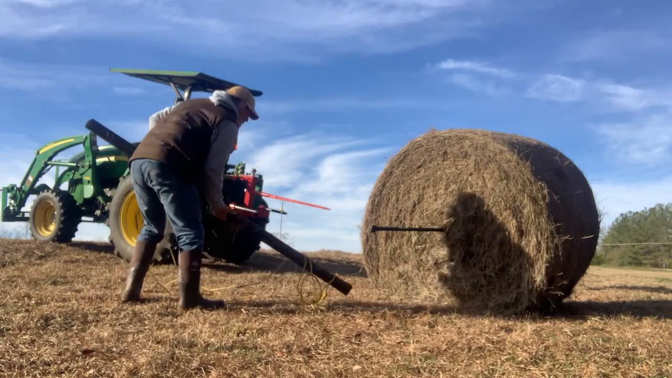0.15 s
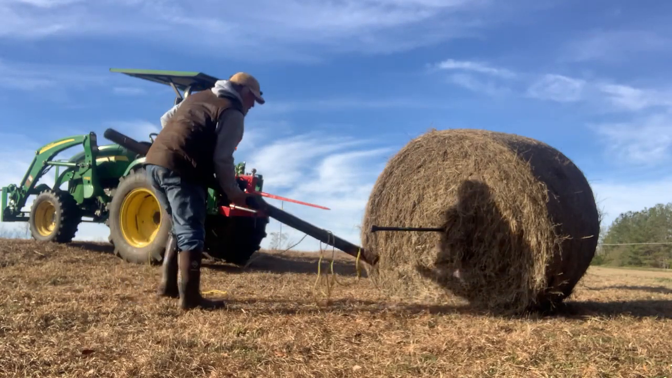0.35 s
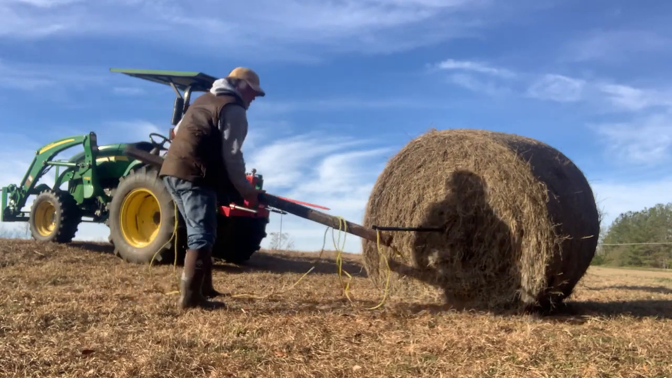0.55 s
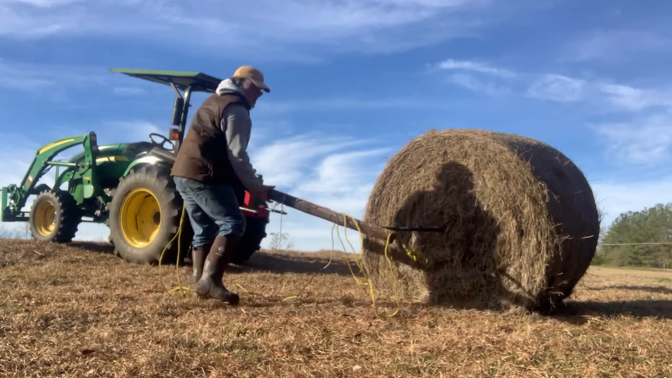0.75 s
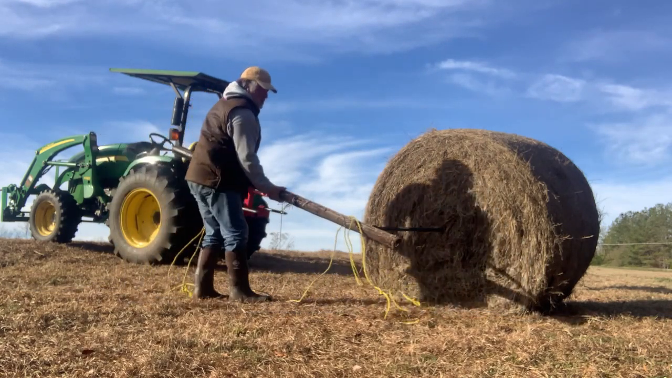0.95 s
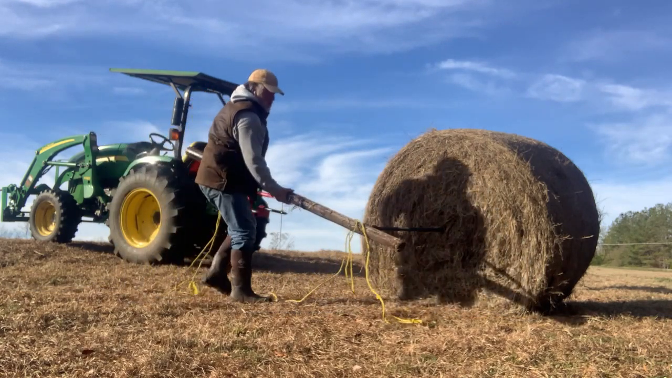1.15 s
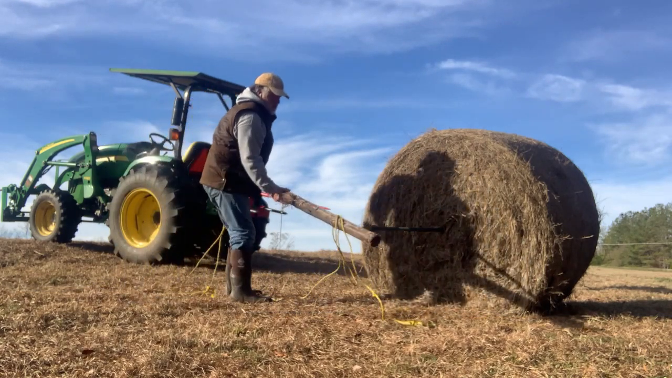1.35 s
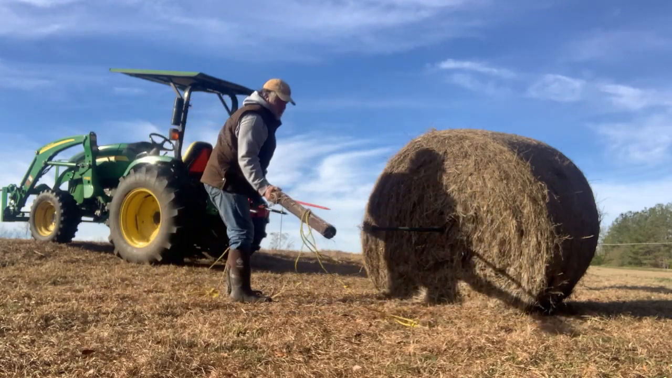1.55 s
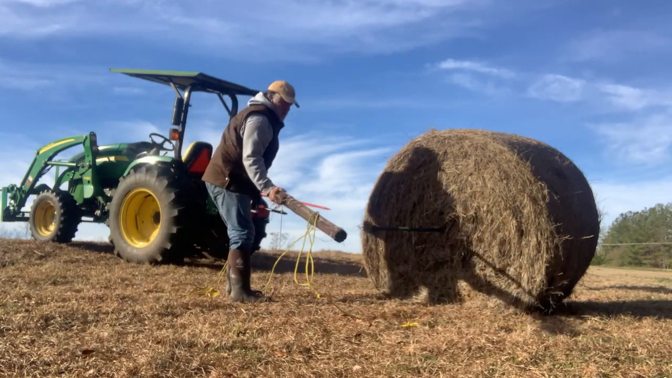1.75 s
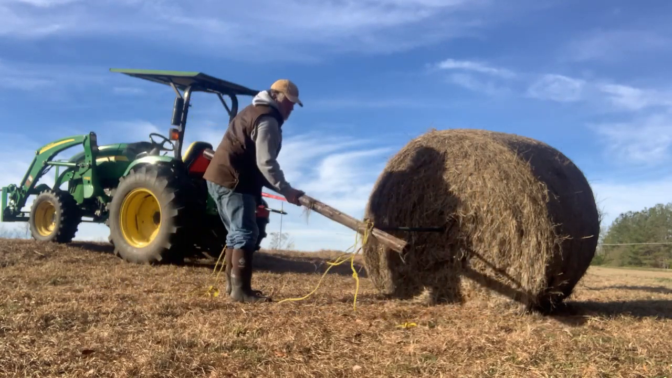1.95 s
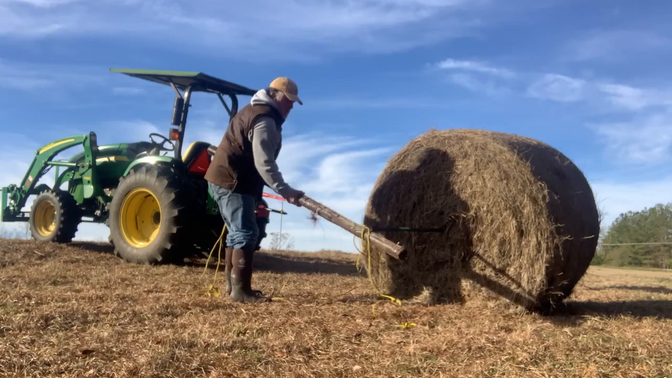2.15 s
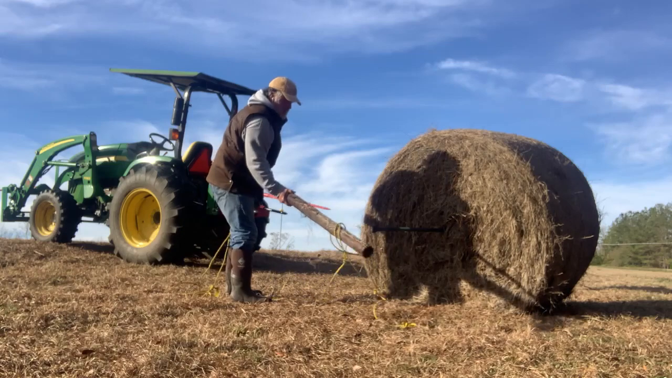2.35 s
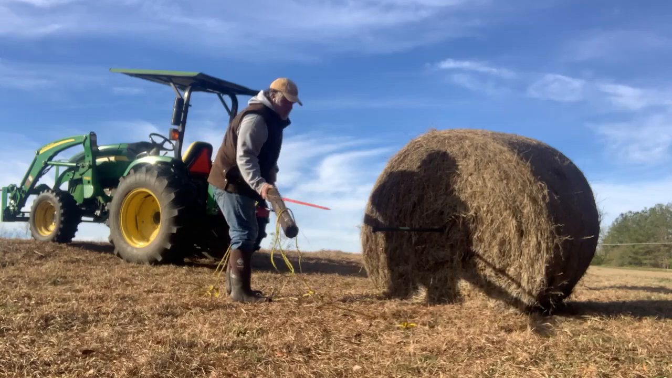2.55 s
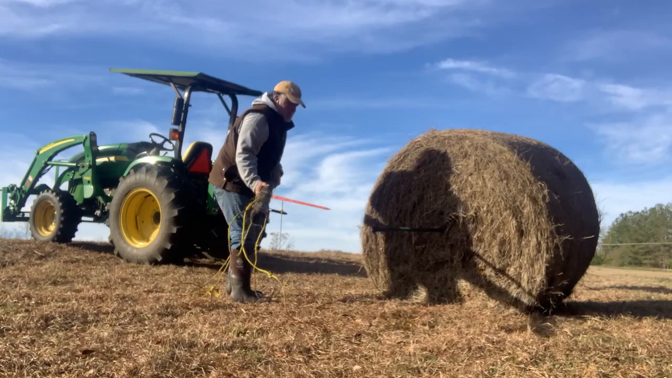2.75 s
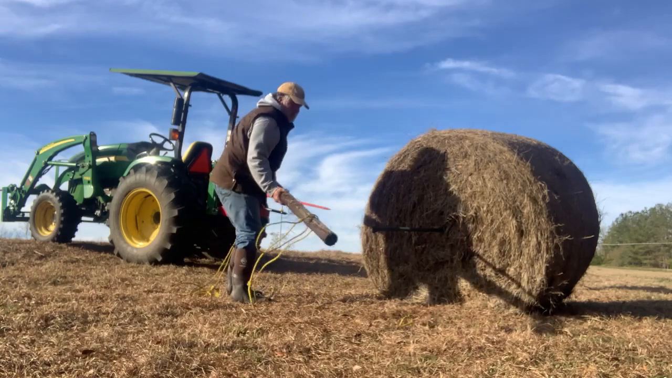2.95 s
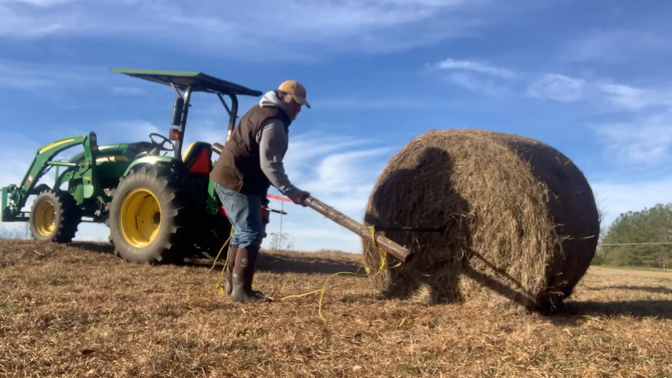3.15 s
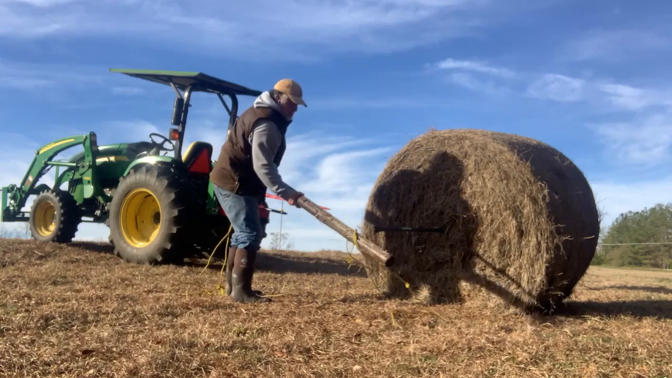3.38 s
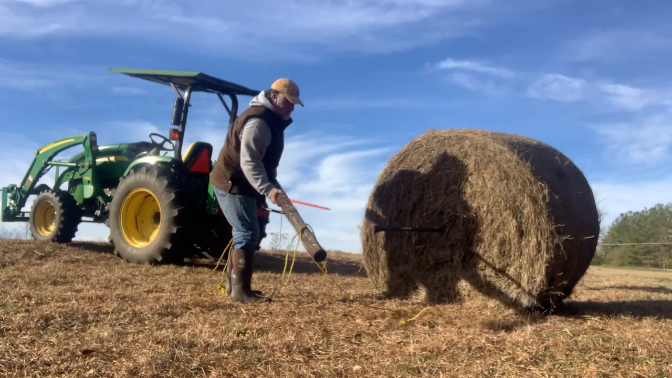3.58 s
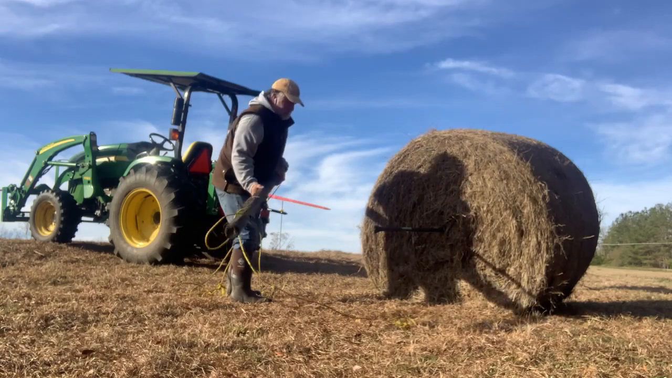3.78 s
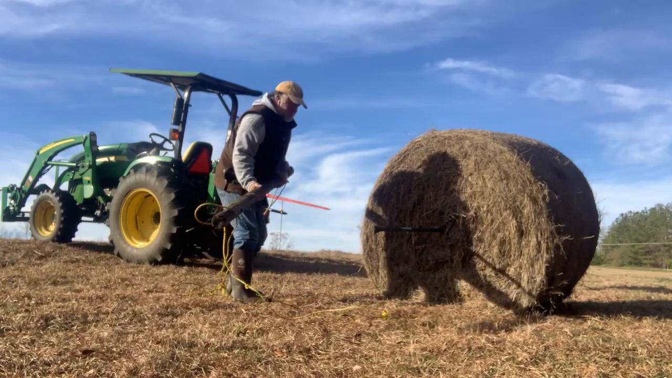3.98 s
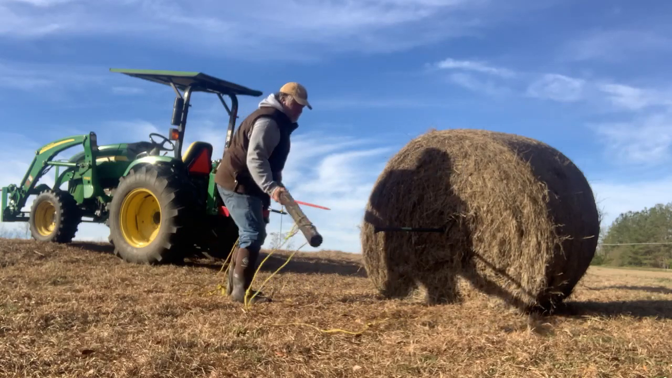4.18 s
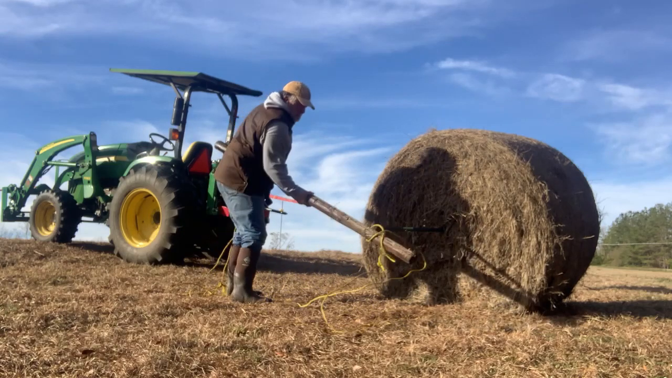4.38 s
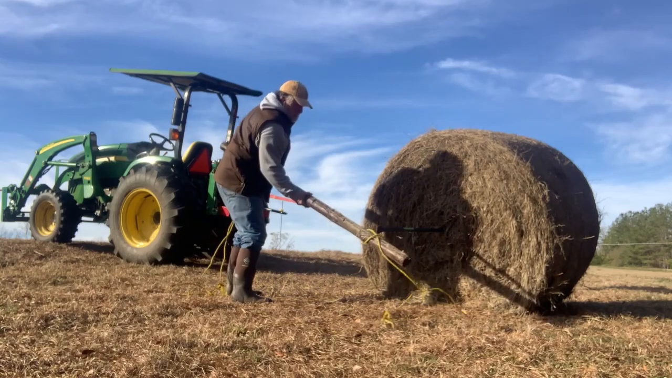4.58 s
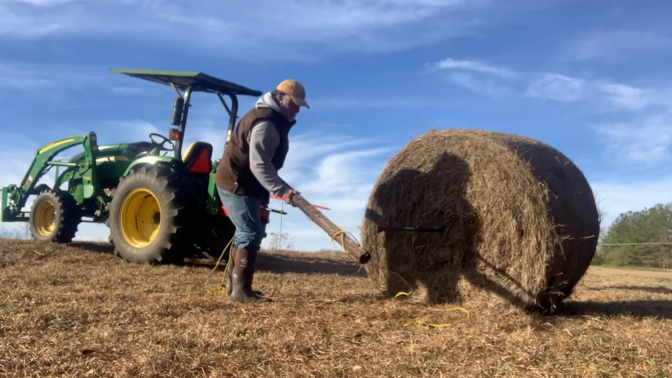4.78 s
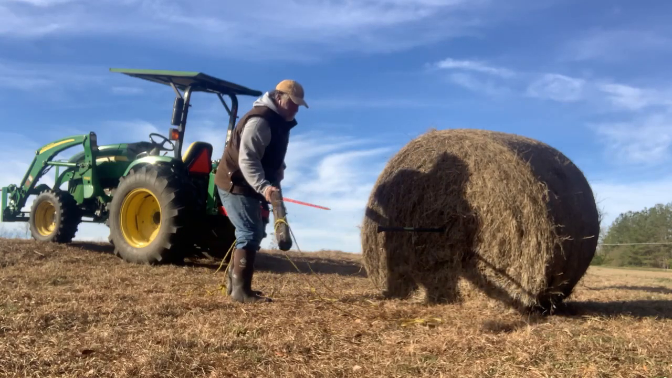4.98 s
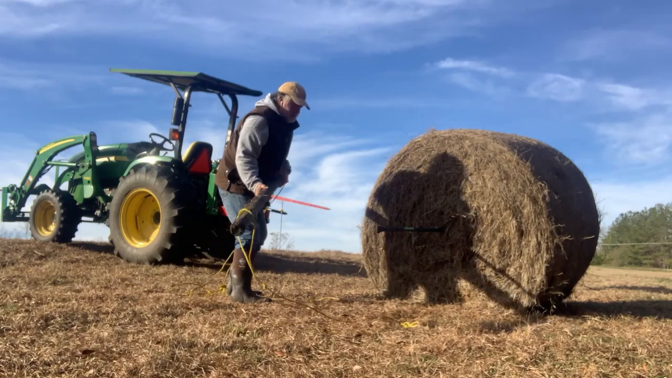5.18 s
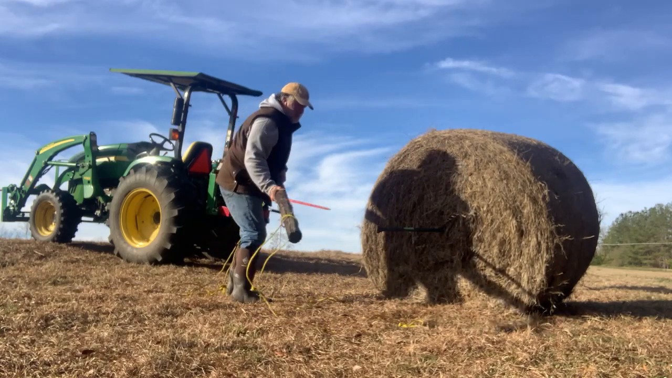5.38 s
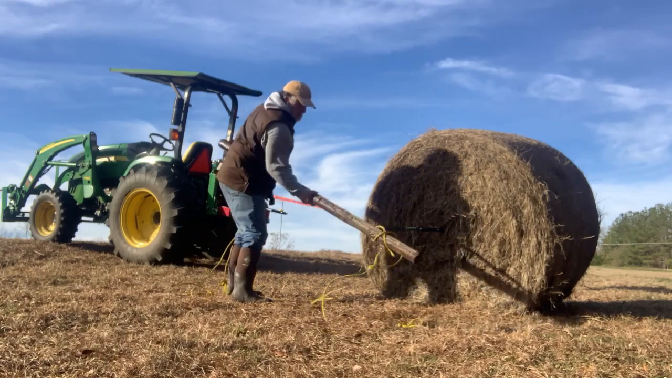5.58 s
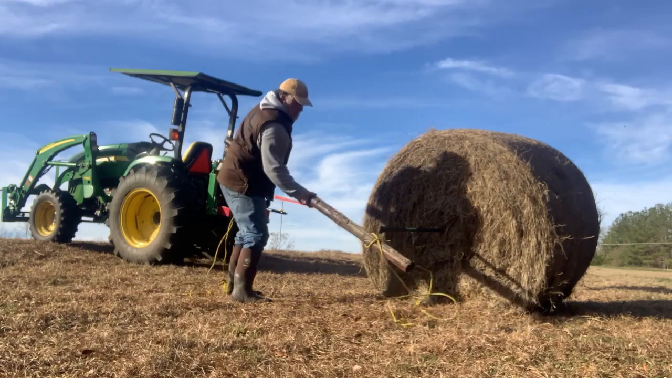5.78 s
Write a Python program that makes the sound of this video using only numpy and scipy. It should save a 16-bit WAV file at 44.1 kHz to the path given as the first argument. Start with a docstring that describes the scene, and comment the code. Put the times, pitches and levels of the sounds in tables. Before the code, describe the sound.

Boots rustle in dry grass over a faint engine rumble, then a wooden post knocks a steel bar four times, slowly.

```python
"""A far engine rumbles and boots shuffle in dry grass in an open field; then a wooden post strikes four times.
It is swung against the end of a steel bar stuck in a hay bale. Rumble, cracks and echoes are filtered noise;
grass, straw and the clatter of the bar are dense random clicks; post and bar are sums of decaying sine modes.
Each blow cracks, rings post and bar, thuds into the bale and shakes the straw; the field sends back a soft echo."""
import sys
import numpy as np
from scipy import signal
from scipy.fft import rfft, irfft, next_fast_len
from scipy.io import wavfile
from scipy.ndimage import map_coordinates

SR = 44100
rng = np.random.default_rng(int(sys.argv[2]) if len(sys.argv) > 2 else 0)


def materialize(psi):
    """Save the field psi as 16-bit PCM at rate SR to the path in sys.argv[1].

    A 1-D psi becomes a single channel; in a 2-D psi each row is a channel.
    """
    bounded = np.clip(np.atleast_2d(psi).T, -1, 1)
    quanta = np.round(bounded * 32767).astype(np.int16)
    wavfile.write(sys.argv[1], SR, quanta)


N = 257103
TIME = np.arange(N) / SR   # s

# All levels in the tables are relative, in dB.
# Faint air, spectrum. Each row: frequency in Hz, density in dB per Hz.
AIR_SPECTRUM = [(1500, -0.5), (2000, -6), (4000, -7), (8000, -7), (16000, -11.5)]
# Far engine, spectrum. Each row: frequency in Hz, density in dB per Hz.
RUMBLE_SPECTRUM = [(15, -49.5), (25, -25), (35, -8.5), (49, -2.5), (66, 1.5), (124, -5.5), (160, -3.5),
                   (238, -15), (273, -21.5), (500, -23.5), (750, -26), (900, -30.5), (1150, -36),
                   (2500, -54), (3250, -72.5), (5500, -120)]
RUMBLE_DB, ENGINE_LEFT_DB = -56, 0.6   # the left side is raised and the right lowered by the second value

# Boots and twine brushing through dry grass. Each row: start in seconds, length in seconds, level in dB.
SCUFFS = [(-0.02, 0.2, -68.5), (0.222, 0.11, -67), (0.463, 0.082, -70), (0.628, 0.073, -67),
          (0.707, 0.058, -69.5), (0.867, 0.066, -64), (1.035, 0.035, -74), (1.116, 0.046, -74),
          (1.28, 0.043, -66), (2.595, 0.04, -75.5), (2.726, 0.032, -75), (3.285, 0.044, -67.5),
          (3.625, 0.04, -72), (3.67, 0.083, -68), (3.823, 0.023, -74), (4.536, 0.072, -62),
          (4.686, 0.029, -70), (4.948, 0.25, -78.5), (5.235, 0.037, -79)]
# Dry grass, spectrum. Each row: frequency in Hz, density in dB per Hz.
GRASS_SPECTRUM = [(400, 0), (1200, -1), (2500, -6), (4500, -2), (8000, -1), (11500, 0), (15500, -1)]
# Every scuff swells as the stalks bend and dies away as they spring back.
SCUFF_RISE_S, SCUFF_T60_S, SCUFF_HOLD_SHARE = 0.014, 0.194, 0.99
# The grass keeps stirring faintly while the post is carried up to the bale.
WALK_END_S, WALK_DB, WALK_T60_S = 1.25, -79.5, 0.42
# Boots set down. Each row: start in seconds, level in dB.
STEPS = [(0.945, -46), (1.232, -48.5), (1.32, -44), (1.508, -49), (4.735, -52)]
# Heel on the ground, spectrum. Each row: frequency in Hz, density in dB per Hz.
STEP_SPECTRUM = [(150, 16), (450, 19), (800, 12.5), (1600, -14), (4000, -13)]
# Stalks snapping. Each row: start in seconds, level in dB.
SNAPS = [(.616, -55.5), (.884, -56), (1.069, -48.5), (1.128, -53), (1.72, -67), (2.0637, -47), (2.263, -58),
         (2.632, -55.5), (3.254, -38.5), (4.627, -50)]
# Snapping stalk, spectrum. Each row: frequency in Hz, density in dB per Hz.
SNAP_SPECTRUM = [(3000, -11), (5000, -2), (7500, 8), (11500, 4), (15500, -1)]
# The post tapping lightly against the bar. Each row: start in seconds, level in dB.
TAPS = [(0.693, -60), (2.065, -49), (2.106, -54.5), (4.733, -66)]
# Light tap, spectrum. Each row: frequency in Hz, density in dB per Hz.
TAP_SPECTRUM = [(900, 13), (1300, 25), (1900, 19), (3000, -51), (6000, 0)]

# Dull part of the field's echo, spectrum. Each row: frequency in Hz, density in dB per Hz.
DULL_ECHO_SPECTRUM = [(50, 20.5), (80, 19), (170, 6.5), (250, 1), (430, 2), (515, 6.5), (600, -8.5),
                      (1000, -8), (1600, -13.5)]
# Brighter part of the echo, spectrum. Each row: frequency in Hz, density in dB per Hz.
ECHO_SPECTRUM = [(700, -2.5), (1200, -5.5), (1650, -1), (2100, -3.5), (2700, -2), (3500, -8), (4250, -1.5),
                 (5000, -9), (6500, -8), (9000, -15.5), (16000, -22)]
# Shaken straw, spectrum. Each row: frequency in Hz, density in dB per Hz.
STRAW_SPECTRUM = [(2000, -16.5), (5000, -1.5), (7500, 9), (9500, -2.5), (11500, 8), (13500, 2.5),
                  (15500, 5.5)]
# Bar clattering in the bale, spectrum. Each row: frequency in Hz, density in dB per Hz.
CLATTER_SPECTRUM = [(450, 5.5), (650, 3.5), (900, -8), (1200, -4), (1750, -2), (2500, -13), (3400, -5.5),
                    (4300, -9), (5200, -10.5), (6500, -5.5), (9500, -23.5), (16000, -26.5)]
# Crack of the contact, spectrum. Each row: frequency in Hz, density in dB per Hz.
CRACK_SPECTRUM = [(500, -3), (1200, -0.5), (2200, -6.5), (3400, -3.5), (4700, -17), (7500, 2.5),
                  (9500, -12), (11500, -8.5), (16000, -16)]

# Blows of the post. Each row: start in seconds, then the levels of thud, body, knock, ring, clang, crack,
# straw and echo in dB, pitch factor, ring length factor, bite centre in Hz, bite boost in dB.
BLOWS = [(1.9805, 2, 0, -6, -7.5, -21.5, -16, -5, -15, 0.96, 1.02, 1860, 8.5),
         (3.1187, 5.5, -7, 0.5, -3, -5, -8, 2, 1, 0.97, 0.95, 1860, 5),
         (4.3591, 4.5, 0, -5.5, -2, 2, -2, -0.5, 4.5, 0.99, 0.93, 1600, 4.5),
         (5.5983, -0.5, 4.5, -5, -9, 5.5, -1, 4.5, 7, 1.0, 0.83, 6400, 9)]
# Register centres in Hz: the bale's deep boom (alike on every blow), thud, body, knock, ring and clang.
REGISTERS_HZ = [80, 180, 340, 520, 1200, 2600]
# Modes of post and bar, before each blow's pitch and length factors.
# Each row: frequency in Hz, level in dB, decay by 60 dB in seconds.
MODES = [(53, -23, 0.21), (70, -17, 0.24), (106.5, -9, 0.11), (120.8, -16, 0.13), (160.7, -16, .09),
         (181.3, -10, 0.1), (203.2, -15.5, 0.076), (294, -28.5, 0.27), (340.4, -10.5, 0.083),
         (379, -18, 0.06), (430.5, -15, 0.045), (530.2, -10, .12), (575, -19.5, 0.12), (707, -24, 0.1),
         (814, -29.5, 0.12), (990, -26.5, 0.11), (1168, -16, 0.09), (1219.4, -19.5, 0.094),
         (1456, -30.5, 0.064), (1604.5, -17, 0.049), (1860, -23, 0.067), (1667, -20, 0.057),
         (2225, -14, 0.049), (2620, -28.5, 0.059), (3310, -17, 0.027), (3490, -21, 0.033),
         (3730, -34, 0.11), (4180, -34.5, .15), (4220, -38, 0.22), (6300, -35, 0.078), (6700, -35, 0.06),
         (10900, -41.5, .1), (11300, -37, 0.11)]
# Each blow favours the modes near its bite; the first two share one bite, the later two differ.
BITE_WIDTH_OCTAVES = 0.12
# The post judders on the bar, then shoves it into the bale.
# Each row: delay after the blow in seconds, level in dB, lowest and highest frequency rung again in Hz.
JUDDER = [(.0042, -9.5, 852, 2002), (0.0206, -11.5, 925, 1723), (0.044, -24, 45, 190)]

# Narrow dips in the microphones' treble. Each row: centre in Hz, width in Hz.
TREBLE_DIPS = [(9500, 1600), (13400, 1400)]
LEFT_LAG_S, CUTOFF_HZ = 0.000082, 16300


def from_db(db):
    """Level to amplitude: 20 dB is a factor of ten."""
    return 10 ** (np.asarray(db) / 20)


def rms_one(x):
    """Normalization to unit root-mean-square amplitude."""
    return x / np.sqrt(np.mean(x ** 2) + 1e-20)


def split_filter(x, hz, kind="low"):
    """Second-order Butterworth filtering: flat in the passband."""
    return signal.sosfilt(signal.butter(2, hz, kind, fs=SR, output="sos"), x)


def coloured(spectrum, source=None):
    """Spectral shaping of white noise or a given source, falling steeply past the ends; unit rms."""
    if source is None:
        source = rng.standard_normal(N)
    hz, db = np.transpose(spectrum)
    size = next_fast_len(N)
    f = np.maximum(np.fft.rfftfreq(size, 1 / SR), 1)
    ends = 1 / np.sqrt((1 + (hz[0] / f / 2) ** 8) * (1 + (f / hz[-1] / 2) ** 8))
    gain = from_db(np.interp(np.log(f), np.log(hz), db))
    return rms_one(irfft(rfft(source, size) * ends * gain, size)[:N])


def burst(start, rise, t60, hold=0):
    """Transient envelope: a smooth swell and hold, then exponential decay by 60 dB per t60."""
    out = np.zeros(N)
    heard = (TIME > start) & (TIME < start + hold + 2 * t60)
    age = TIME[heard] - start
    swell = 1 - np.exp(-(age / rise) ** 2)
    out[heard] = swell * from_db(-60 * np.maximum(age - hold, 0) / t60)
    return out


def grains(per_s, spread_db):
    """Shot noise: random independent clicks of uneven size."""
    present = rng.random(N) < per_s / SR
    size = rng.standard_normal(N)
    return present * size * from_db(spread_db * np.minimum(rng.exponential(1, N), 4))


def at_ports(x, left_lag_s):
    """Time difference of arrival: sound from the right reaches the left microphone a little later."""
    left = map_coordinates(x, [np.arange(N) - left_lag_s * SR], order=3)
    return np.array([left, x])


def scattered(spectrum, apart, per_s=None):
    """Partial coherence: one part arrives straight, another is unrelated at the two microphones."""
    def draw():
        return coloured(spectrum, grains(per_s, spread_db=1.0) if per_s else None)
    straight = at_ports(draw(), LEFT_LAG_S)
    unrelated = np.array([draw(), draw()])
    return (straight + apart * unrelated) / np.hypot(1, apart)


def flutter(depth_db, rate_hz):
    """Random amplitude modulation: the gain in dB runs in straight lines between random levels."""
    knots = rng.standard_normal(400)
    return from_db(depth_db * np.interp(TIME * rate_hz, np.arange(len(knots)), knots))


def patchy(x, depth_db, rate_hz):
    """Independent modulation of third-octave bands; the outermost bands take in all below and above."""
    size = next_fast_len(N)
    spectrum = rfft(x, size)
    f = np.maximum(np.fft.rfftfreq(size, 1 / SR), 1)
    band = np.clip(3 * np.log2(f / 1000), 0, 11).astype(int)
    out = 0
    for k in np.unique(band):
        out = out + irfft(spectrum * (band == k), size)[:, :N] * flutter(depth_db, rate_hz)
    return out


def faint_air(air_db=-78.0):
    """Diffuse background noise: steady and only partly coherent between the sides."""
    return from_db(air_db) * scattered(AIR_SPECTRUM, apart=1.0)


def engine(firing_hz=22, throb=0.28):
    """Amplitude modulation: a dull rumble from the left throbs a little with the firing."""
    sides = from_db(ENGINE_LEFT_DB * np.array([[1], [-1]]))
    throbbing = 1 + throb * np.sin(2 * np.pi * firing_hz * TIME)
    return sides * from_db(RUMBLE_DB) * coloured(RUMBLE_SPECTRUM) * throbbing


def boots(grass_db=3, step_db=-8, snap_db=-8):
    """Friction and fracture: dry grass crackles at every scuff, heels land softly, single stalks snap."""
    level = sum(from_db(db) * burst(s, SCUFF_RISE_S, SCUFF_T60_S, SCUFF_HOLD_SHARE * length)
                for s, length, db in SCUFFS)
    walk = from_db(WALK_DB) * burst(0, SCUFF_RISE_S, WALK_T60_S, WALK_END_S)
    level = np.hypot(level, walk)   # the two add in power
    crackle = scattered(GRASS_SPECTRUM, apart=1.0, per_s=1800) * flutter(depth_db=2, rate_hz=55)
    heel_level = sum(from_db(db + step_db) * burst(s - .003, rise=0.0018, t60=0.19) for s, db in STEPS)
    snap_level = sum(from_db(db + snap_db) * burst(s, rise=0.00015, t60=0.04) for s, db in SNAPS)
    heels = coloured(STEP_SPECTRUM) * heel_level
    snaps = coloured(SNAP_SPECTRUM) * snap_level
    return from_db(grass_db) * level * crackle + at_ports(heels + snaps, LEFT_LAG_S)


def taps(tap_db=-2):
    """Light impact: small dry touches of wood as quickly damped noise."""
    level = sum(from_db(db + tap_db) * burst(s, rise=0.0016, t60=0.11) for s, db in TAPS)
    return at_ports(coloured(TAP_SPECTRUM) * level, LEFT_LAG_S)


def field_echo(dull_db=-50, middle_db=-56, high_db=-56, split_hz=3000, treble_growth=1.0):
    """Scattering and absorption: ground and far trees return each blow unevenly; air takes the treble first."""
    dull = scattered(DULL_ECHO_SPECTRUM, apart=0.17)
    wash = patchy(scattered(ECHO_SPECTRUM, apart=1.0, per_s=2200), depth_db=3.2, rate_hz=50)
    middle = split_filter(wash, split_hz)
    high = split_filter(-wash, split_hz, "high")
    out = 0
    for s, thud, body, knock, ring, clang, sharp, shaken, echo_db, *_ in BLOWS:
        bright_db = high_db + echo_db + treble_growth * sharp   # brighter after a sharp blow
        out = out + from_db(dull_db) * dull * burst(s, rise=0.02, t60=0.45, hold=0.12)
        out = out + from_db(middle_db + echo_db) * middle * burst(s, rise=0.019, t60=1.0, hold=0.12)
        out = out + from_db(bright_db) * high * burst(s, rise=0.0078, t60=0.35, hold=0.16)
    return out


def settling_straw(settle_db=-68, stalks_per_s=500):
    """Relaxation: after each blow the bale creeps back and its stalks tick, the more the harder it shook."""
    ticks = scattered(STRAW_SPECTRUM, apart=.6, per_s=stalks_per_s)
    return ticks * sum(from_db(settle_db + shaken) * burst(s, rise=.03, t60=0.36, hold=0.19)
                       for s, thud, body, knock, ring, clang, sharp, shaken, *_ in BLOWS)


def ringing(start, register_db, pitch, length, bite_hz, bite_db, travel_s=0.05):
    """Modal sum with dispersion: bending waves make the low modes come late and swell slowly."""
    out, first = np.zeros(N), int(start * SR)
    t = TIME[:min(N - first, SR // 3)]
    for hz, db, t60 in MODES:
        age = np.maximum(t - travel_s / np.sqrt(hz), 0)
        level = db + np.interp(np.log(hz), np.log(REGISTERS_HZ), register_db)
        level += .5 * rng.standard_normal()
        level += bite_db * np.exp(-(np.log2(hz / bite_hz) / BITE_WIDTH_OCTAVES) ** 2)
        swell = 1 - np.exp(-(age * hz / .7) ** 2)
        decay = from_db(level - 60 * age / (t60 * length))
        out[first:first + len(t)] += swell * decay * np.sin(2 * np.pi * hz * pitch * age)
    return out


def judder(rings):
    """Repeated contact: lighter second touches ring only some of the modes again."""
    out = 0
    for delay, db, low, high in JUDDER:
        again = split_filter(rings, [low, high], "band")
        out = out + from_db(db) * np.interp(TIME - delay, TIME, again)
    return out


def blows(crack_db=-7.0, clatter_db=-27.0, straw_db=-41.5, hollow_hz=245):
    """Impact excitation: contact cracks, modes ring, the bar clatters briefly in the bale and shakes straw."""
    crack = scattered(CRACK_SPECTRUM, apart=.5)
    clatter = scattered(CLATTER_SPECTRUM, apart=.4, per_s=3000)
    straw = scattered(STRAW_SPECTRUM, apart=.6, per_s=4000) * flutter(depth_db=2, rate_hz=60)
    rings, noise = np.zeros(N), np.zeros((2, N))
    for (s, thud, body, knock, ring, clang, sharp, shaken, echo_db,
         pitch, length, bite_hz, bite_db) in BLOWS:
        register_db = [0, thud, body, knock, ring, clang]
        rings += ringing(s, register_db, pitch, length, bite_hz, bite_db)
        noise += from_db(crack_db + sharp) * crack * burst(s - .0003, rise=0.002, t60=0.022, hold=0.0021)
        clatter_level = from_db(clatter_db + (ring + clang) / 2)
        noise += clatter_level * clatter * burst(s - .002, rise=0.0027, t60=0.08, hold=0.033)
        noise += from_db(straw_db + shaken) * straw * burst(s, rise=0.0033, t60=0.13, hold=0.058)
    # an antiresonance between thud and body makes the knock hollow
    hollow = signal.iirnotch(hollow_hz, 3.5, fs=SR)
    knocks = signal.lfilter(*hollow, rings + judder(rings))
    return at_ports(knocks, LEFT_LAG_S) + noise


def scene():
    """Superposition: engine and faint air behind, echo around, the work a little to the right."""
    background = faint_air() + engine()
    return background + boots() + taps() + field_echo() + settling_straw() + blows()


def record(dry):
    """Band limiting and soft saturation: bass leans left, treble has dips, the highest peaks are rounded."""
    lean = .16 * split_filter(dry, 130) * [[1], [-1]]
    heard = signal.sosfilt(signal.butter(3, 40, "high", fs=SR, output="sos"), dry + lean)
    for hz, width in TREBLE_DIPS:
        heard = signal.lfilter(*signal.iirnotch(hz, hz / width, fs=SR), heard)
    rounded = 1.2 * np.tanh(heard / 1.2)
    return signal.sosfilt(signal.ellip(10, .2, 80, CUTOFF_HZ, fs=SR, output="sos"), rounded)


dry = scene()
out = record(dry)
materialize(out)
```